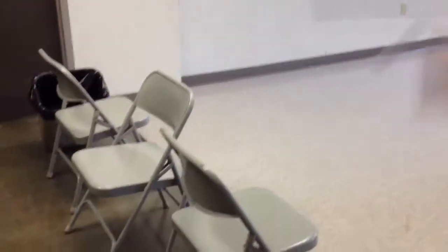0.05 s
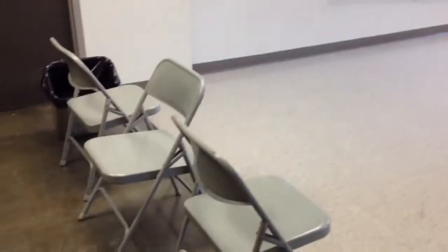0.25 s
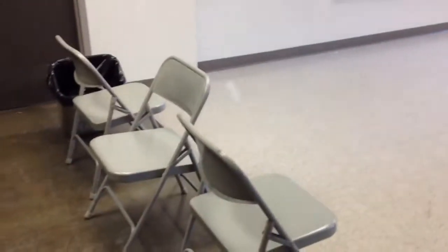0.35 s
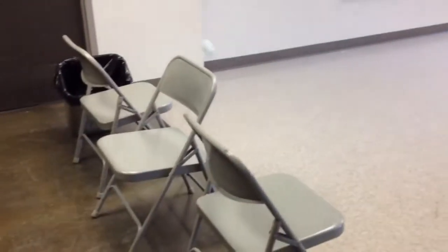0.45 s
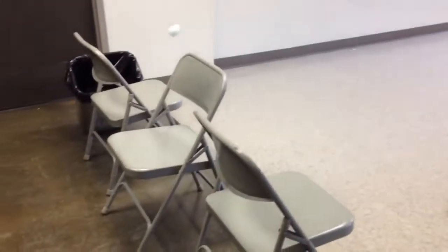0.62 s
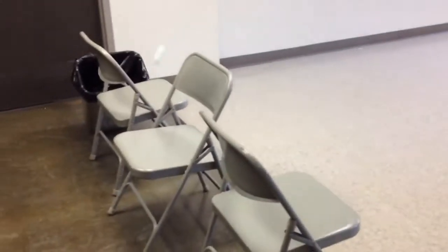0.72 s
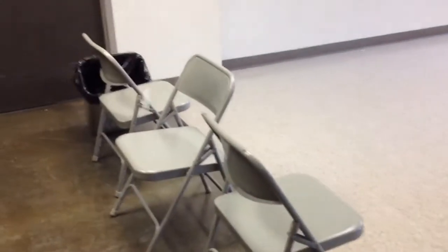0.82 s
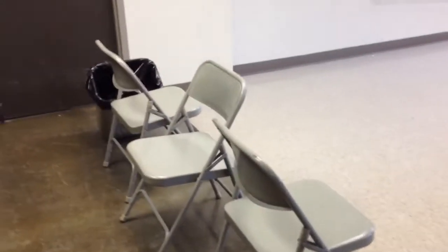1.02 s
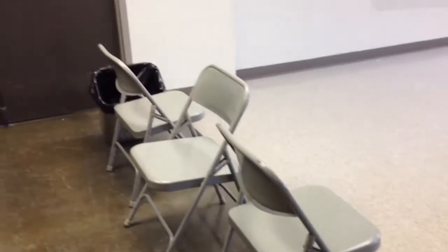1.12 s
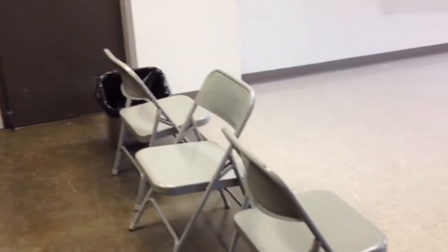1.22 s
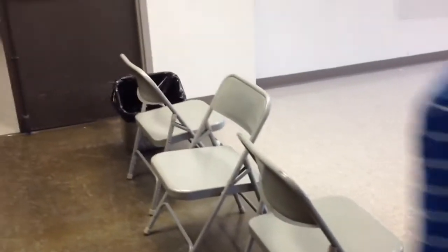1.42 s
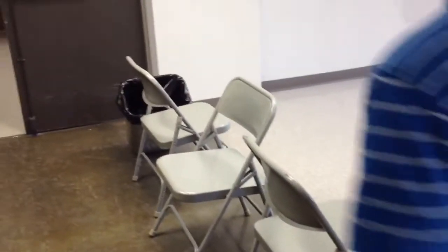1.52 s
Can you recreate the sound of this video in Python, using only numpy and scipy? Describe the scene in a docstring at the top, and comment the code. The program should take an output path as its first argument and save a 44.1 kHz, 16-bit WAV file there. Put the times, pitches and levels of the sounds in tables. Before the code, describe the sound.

A light plastic ball clangs off a metal chair, then rattles into a trash can.

```python
"""Plastic ball, steel chair and trash can

A light plastic ball strikes a steel folding chair in a bare room: a sharp clack and a bang, then
a dense clang of crowded modes, of which a few ring on. The ball drops into a lined trash can and
bounces five times; each contact knocks the wall, crackles the thin liner and rings the ball's shell.
Ventilation hums faintly throughout, with two faint ticks before the blow and a shoe scuff after it."""
import sys
import numpy as np
from scipy import signal
from scipy.fft import rfft, irfft
from scipy.io import wavfile

SR = 44100
rng = np.random.default_rng(int(sys.argv[2]) if len(sys.argv) > 2 else 0)


def generate_wav(sig):
    """Save sig (samples, or channels by samples) to the path in sys.argv[1] as 16-bit PCM at SR."""
    pcm = np.round(np.clip(np.atleast_2d(sig).T, -1, 1) * 32767).astype(np.int16)
    wavfile.write(sys.argv[1], SR, pcm)


N = 68355
T = np.arange(N) / SR
HZ = np.maximum(np.fft.rfftfreq(N, 1 / SR), 1)

# contacts in the can: t/s, knock level/dB, tick level/dB, crackle level/dB, crackle t60/s
BOUNCES = [(1.0024, -7, -5.5, -2.5, 0.05), (1.0413, 1, -8, -7.5, 0.09), (1.1226, -10, -13, -7.5, 0.051),
           (1.1962, -1, -21.5, -11, 0.031), (1.2606, -7, -4, -11.5, 0.073)]


def chair(start=.2362, build_s=.0053):
    """Impact excitation: one blow drives the steel's modes, which decay freely; close pairs beat."""
    # modes of seat and frame: f/Hz, level/dB, t60/s
    modes = [(258, -38.6, 2.9), (278.5, -37.5, 4.4), (327, -46, 2.2), (435, -33.8, 2.1), (541.5, -48, 3.4),
             (549, -49, 3.4), (686, -41.3, 6), (791.7, -27, 3), (797, -28, .45), (960, -25.5, 1.15),
             (970.5, -26.5, 1.35), (1085, -22, .52), (1152.5, -19, 1.46), (1173, -20.5, .95),
             (1241, -29.5, 1.25), (1286, -21, .65), (1320, -27.5, 1.25), (1373, -33, 1.5), (1422, -36, 1.5),
             (1454, -29.5, 1.46), (1498, -38, 1.7), (1523, -35.5, 2.5), (1556, -18, .42), (1660, -21, .5),
             (1740, -25, .55), (1840, -27.5, .85), (1898, -23, .57), (1937, -29, 1.1), (1942, -34, 2.1),
             (2099, -31, .85), (2245, -31, .8), (2303, -23.5, .82), (2552, -30, .5), (2724, -44, 1.35),
             (3009, -41, .74), (3241, -47, .9), (3661, -40, 1.45), (3865, -40, .55)]
    # spectra of the ball's clack, the seat panel's bang and the crowded modes: f/Hz, level/(dB per Hz)
    clack_spectrum = [(100, -71), (1200, -40.5), (3000, -67), (7000, -80), (12500, -53.5), (15000, -70)]
    bang_spectrum = [(50, -91), (110, -79), (220, -53.5), (500, -53), (850, -49), (1200, -43),
                     (1900, -46.5), (2500, -57), (3000, -83), (8500, -66.5), (15000, -75)]
    clang_spectrum = [(50, -95), (95, -85), (160, -67.5), (300, -58), (550, -59), (900, -53.5),
                      (1400, -49.5), (2200, -51), (2600, -57), (2900, -66), (3800, -61), (5000, -62.5),
                      (6300, -71), (8500, -65.5), (10500, -74), (13300, -70.5), (15000, -80)]
    # decay of the crowded modes: f/Hz, t60/s
    clang_decay = [(60, 0.2), (250, 0.85), (1000, 1.1), (2000, 0.78), (2900, 1.05), (4500, 0.64),
                   (8500, 0.63), (14000, 0.46)]
    blow = [(start, 0)]
    clack = through(bursts(blow, t60=.025), clack_spectrum)
    bang = through(rng.standard_normal(N) * dying(start, t60=.23, build_s=.00074), bang_spectrum)
    clang = wash(blow, clang_spectrum, clang_decay, build_s)
    ring = sum(from_db(db) * dying(start, t60, build_s) * sine(hz) for hz, db, t60 in modes)
    return clack + bang + clang + ring


def can_wall(contact_db=14):
    """Contact and flexure: each bounce gives a hard tick and a hollow knock, and both reverberate."""
    # spectra of the can's knock and the ball's tick: f/Hz, level/(dB per Hz)
    knock_spectrum = [(50, -106), (100, -99), (200, -69), (450, -68), (800, -64), (1300, -64.5),
                      (2100, -65.5), (2800, -78.5), (4700, -76), (6500, -83.5), (15000, -81)]
    tick_spectrum = [(60, -91), (250, -72), (800, -70), (1350, -55), (2200, -55.5), (3000, -65),
                     (4900, -67.5), (7000, -67), (10000, -89), (15000, -86)]
    knocks = [(s, db) for s, db, _, _, _ in BOUNCES]
    ticks = [(s, db) for s, _, db, _, _ in BOUNCES]
    flex_envelope = sum(from_db(db) * dying(s, t60=.11, build_s=.0015) for s, db in knocks)
    knock = through(rng.standard_normal(N) * flex_envelope, knock_spectrum)
    contact = from_db(contact_db) * impulses(ticks) + bursts(ticks, t60=.023)
    tails = room(knocks, knock_spectrum, gain_db=-6) + room(ticks, tick_spectrum, gain_db=-19)
    return knock + through(contact, tick_spectrum) + tails


def liner(snaps_per_s=5000, spread_db=2.5):
    """Shot noise: each bounce sets off a dying shower of snaps in the film, which rings the ball too."""
    # spectrum of the crackle: f/Hz, level/(dB per Hz)
    spectrum = [(2000, -110), (4700, -68), (7200, -98), (8300, -62), (9200, -71), (9600, -67.5),
                (11700, -58), (13300, -60), (15000, -76)]
    # single creases snapping after the landing: t/s, level/dB
    creases = [(1.0046, 2.5), (1.0135, -4), (1.0188, -7), (1.026, -5)]
    snaps = (rng.random(N) < snaps_per_s / SR) * rng.choice([-1, 1], N)
    snaps = snaps * from_db(spread_db * rng.standard_normal(N))
    shower = snaps / snaps.std() * sum(from_db(db) * dying(s, t60) for s, _, _, db, t60 in BOUNCES)
    # a shower's energy grows with its duration
    longest = max(t60 for *_, t60 in BOUNCES)
    energies = [(s, db + 10 * np.log10(t60 / longest)) for s, _, _, db, t60 in BOUNCES]
    crackle = through(shower + bursts(creases, t60=.012), spectrum)
    return crackle + ball_shell(shower, energies) + room(energies, spectrum, gain_db=-13)


def ball_shell(push, hits, room_db=-13.5):
    """Forced resonance: the thin shell's modes filter a push and a reverberant tail for each hit."""
    # shell modes: f/Hz, peak level/(dB per Hz), t60/s
    modes = [(8360, -61, 0.018), (9200, -55.5, 0.024), (10100, -55.5, 0.026), (12260, -58, 0.076),
             (12100, -61, 0.065), (13000, -75, 0.041)]
    mean_hz = np.mean([hz for hz, _, _ in modes])
    drive = push + from_db(room_db) * bursts(hits, at_hz(room_decay(), mean_hz)) + 1e-18
    ring = 0
    for hz, db, t60 in modes:
        radius = from_db(-60 / (t60 * SR))
        numerator = np.array([1, 0, -1]) * (1 - radius ** 2) / 2
        denominator = [1, -2 * radius * np.cos(2 * np.pi * hz / SR), radius ** 2]
        ring += from_db(db) * np.sqrt(SR / 2) * signal.lfilter(numerator, denominator, drive)
    return ring


def room(hits, spectrum, gain_db):
    """Reverberation: the bare room prolongs each hit as a diffuse tail."""
    return from_db(gain_db) * wash(hits, spectrum, room_decay(), build_s=.0051)


def room_decay():
    """Absorption varies with frequency, and with it the reverberation time."""
    # the room's decay: f/Hz, t60/s
    reverberation_times = [(60, .4), (250, 2.57), (1200, 0.83), (4000, 0.84), (9000, 0.58), (14000, 0.38)]
    return reverberation_times


def shoe_scuff():
    """Sliding friction: a shoe brushes the floor as the thrower moves off."""
    # friction noise: f/Hz, level/(dB per Hz)
    spectrum = [(60, -100), (120, -84), (500, -79.5), (2000, -82), (3200, -91.5), (4300, -88.5),
                (5600, -98), (7500, -98), (10000, -108), (15000, -114)]
    return noise(spectrum) * dying(.7714, t60=.7, build_s=.013)


def faint_ticks():
    """Damped transients: two small, high ticks precede the blow."""
    # onsets: t/s, level/dB
    ticks = [(.1645, -1), (.1815, 1)]
    # their spectrum: f/Hz, level/(dB per Hz)
    spectrum = [(1000, -100), (2800, -97), (4300, -81), (5800, -97), (8000, -90), (11000, -102)]
    return through(bursts(ticks, t60=.0086), spectrum)


def ventilation():
    """Broadband and tonal noise: a steady rush of air with a hum."""
    # air noise: f/Hz, level/(dB per Hz)
    air_spectrum = [(25, -116), (80, -106), (125, -84), (280, -87.5), (600, -91), (1500, -98), (2700, -105),
                    (4400, -105), (6000, -111), (8000, -111), (10000, -115), (15000, -115)]
    # hum lines: f/Hz, rms level/dB
    hum_lines = [(120, -69.5), (232, -58.5), (1119.5, -62), (1238, -71)]
    return noise(air_spectrum) + sum(np.sqrt(2) * from_db(db) * sine(hz) for hz, db in hum_lines)


def from_db(db):
    """Amplitude ratio of a level in decibels."""
    return 10 ** (np.asarray(db) / 20)


def at_hz(points, hz):
    """Interpolation on a logarithmic frequency axis."""
    frequencies, values = np.transpose(points)
    return np.interp(np.log(hz), np.log(frequencies), values)


def sine(hz):
    """Simple harmonic motion of random phase."""
    return np.sin(2 * np.pi * (hz * T + rng.random()))


def dying(start, t60, build_s=0):
    """Exponential decay: the envelope rises at start and falls 60 dB in t60 seconds."""
    age = np.maximum(T - start, 0)
    rise = 1 - np.exp(-age / (build_s + 1 / SR))
    return rise * np.exp(-np.log(1000) * age / t60)


def impulses(hits):
    """Ideal impulses: one click for each (t/s, level/dB) contact."""
    clicks = np.zeros(N)
    for s, db in hits:
        clicks[int(s * SR)] += from_db(db)
    return clicks


def bursts(hits, t60):
    """Random excitation: a decaying push of random sign for each (t/s, level/dB) contact."""
    return rng.choice([-1, 1], N) * sum(from_db(db) * dying(s, t60) for s, db in hits)


def noise(spectrum):
    """Stationary noise of the given spectral density."""
    return irfft(rfft(rng.standard_normal(N)) * from_db(at_hz(spectrum, HZ)) * np.sqrt(SR / 2), N)


def through(push, spectrum):
    """Minimum-phase filtering: unit white noise comes out with the given spectral density."""
    cepstrum = irfft(np.log(from_db(at_hz(spectrum, HZ)) * np.sqrt(SR / 2)), N)
    # folding onto positive time makes the response causal
    cepstrum[1:N // 2] *= 2
    cepstrum[N // 2:] = 0
    response = irfft(np.exp(rfft(cepstrum)), N)[:N // 20]
    return signal.fftconvolve(push, response)[:N]


def wash(hits, spectrum, decay, build_s, bands=14):
    """Diffuse field: the (t/s, level/dB) hits add in power, and each band dies at its own rate."""
    noise_bins = rfft(noise(spectrum))
    centres = np.geomspace(60, 15000, bands)
    field = 0
    for hz, share in zip(centres, np.eye(bands)):
        band = irfft(noise_bins * np.interp(np.log(HZ), np.log(centres), share), N)
        power = sum((from_db(db) * dying(s, at_hz(decay, hz), build_s)) ** 2 for s, db in hits)
        field += band * np.sqrt(power)
    return field


def scene():
    """Superposition: all sources add at one microphone."""
    return (chair() + can_wall() + liner() + shoe_scuff() + faint_ticks() + ventilation())[None]


def record(dry):
    """Band limiting: a steep elliptic low-pass cuts the highest treble."""
    cutoff_hz = 15150
    return signal.sosfilt(signal.ellip(10, .3, 80, cutoff_hz, fs=SR, output="sos"), dry)


dry = scene()
out = record(dry)
generate_wav(out)
```